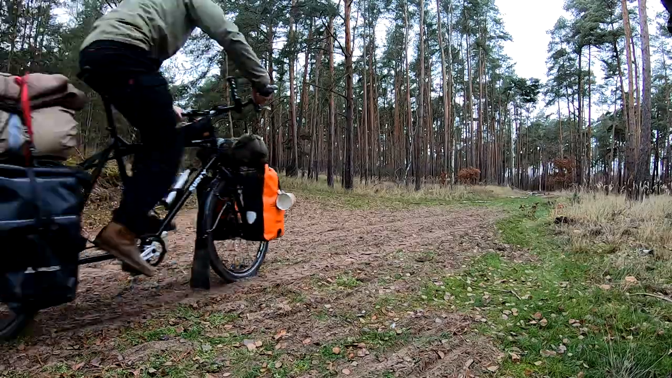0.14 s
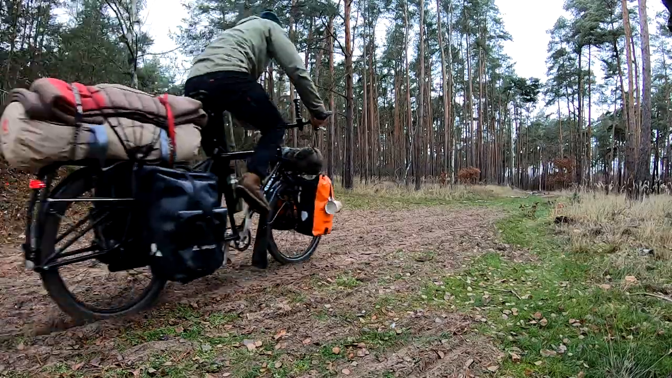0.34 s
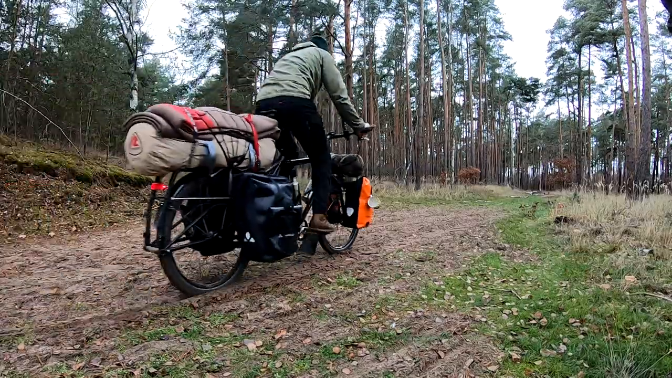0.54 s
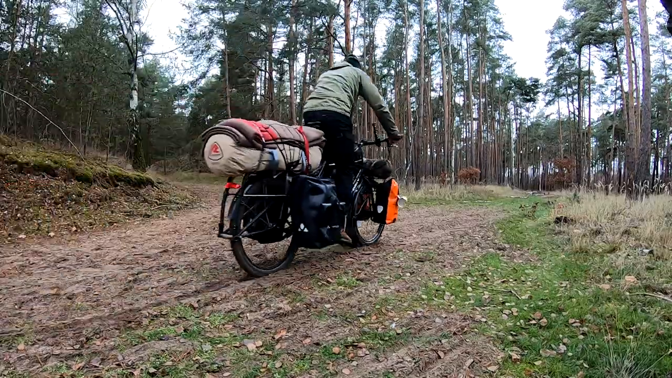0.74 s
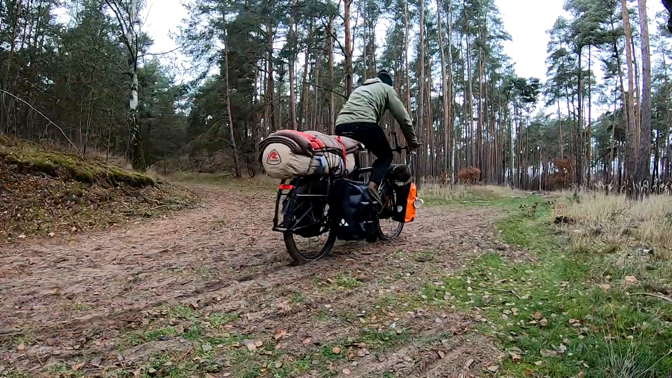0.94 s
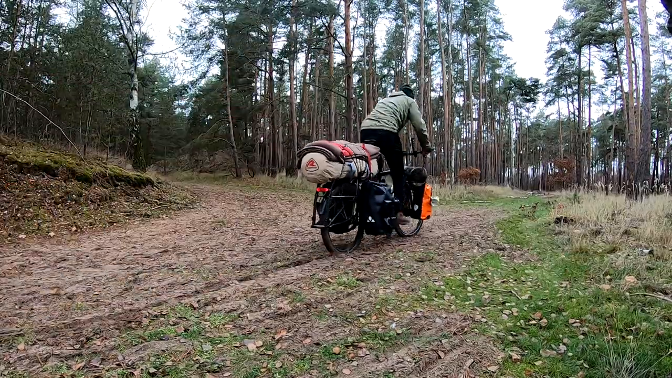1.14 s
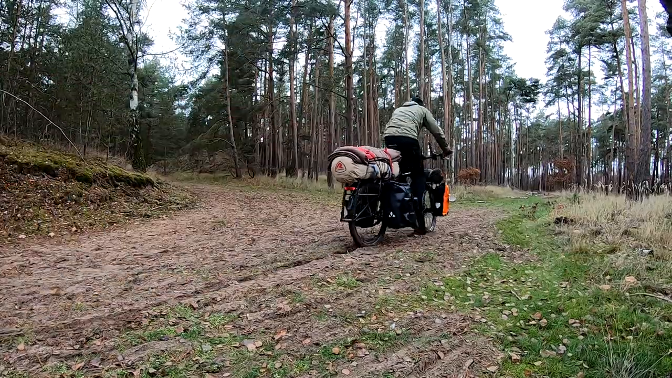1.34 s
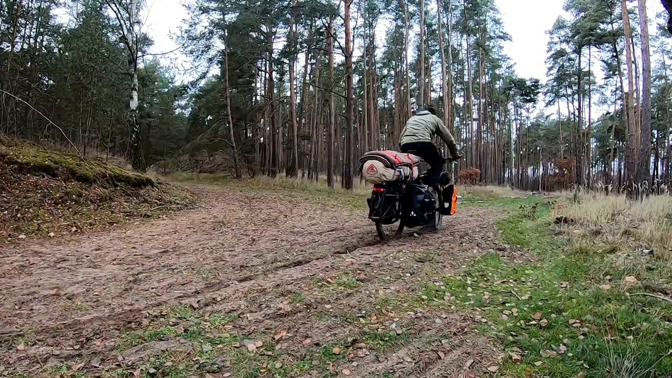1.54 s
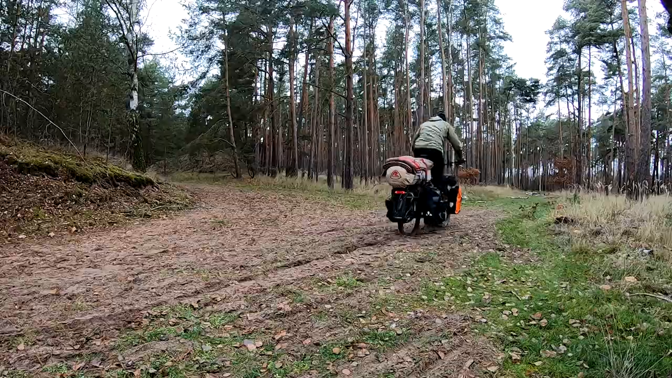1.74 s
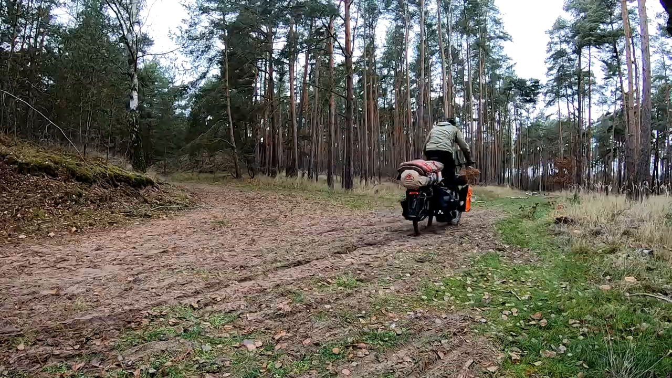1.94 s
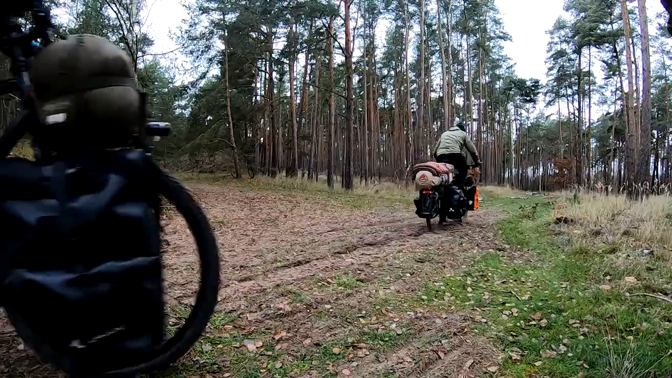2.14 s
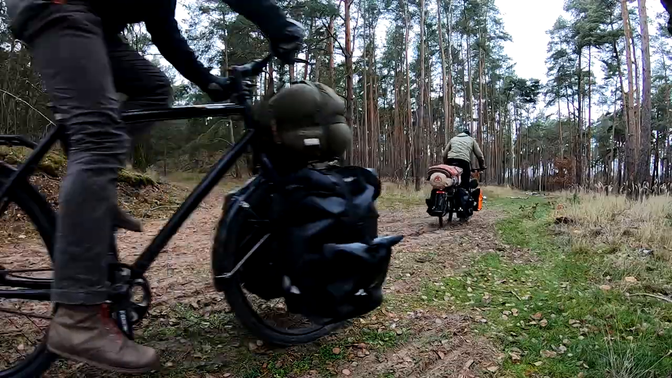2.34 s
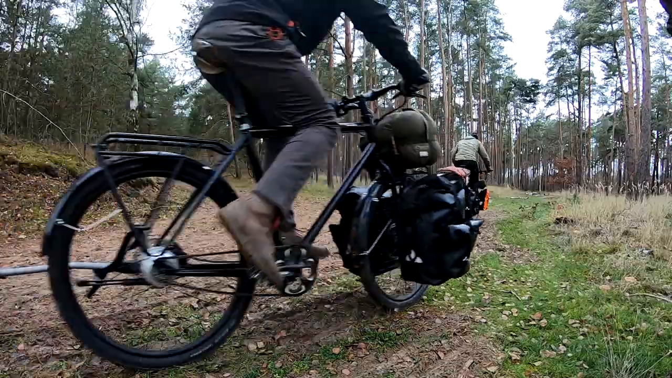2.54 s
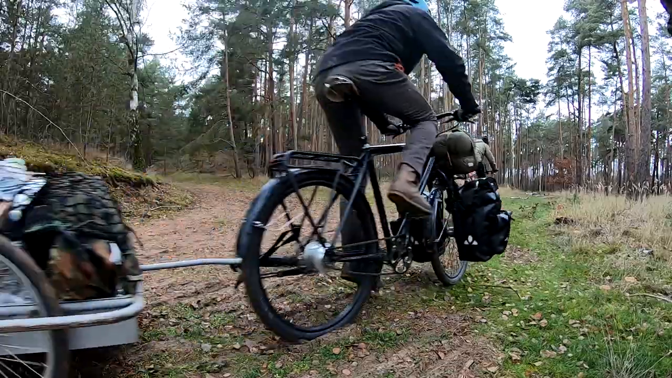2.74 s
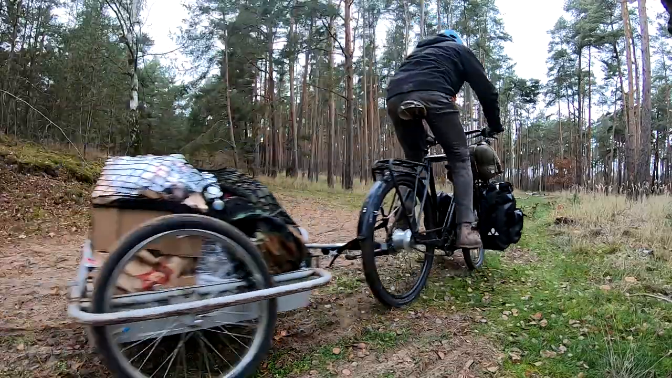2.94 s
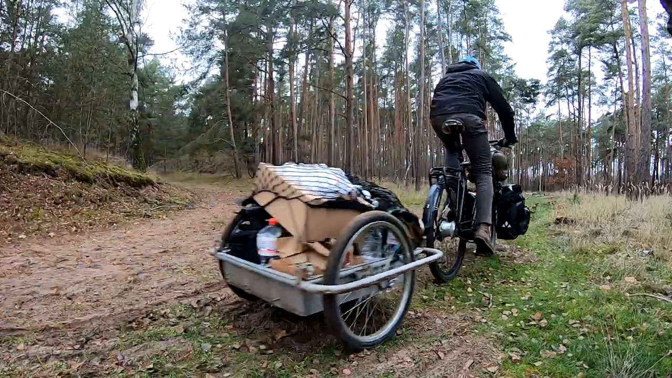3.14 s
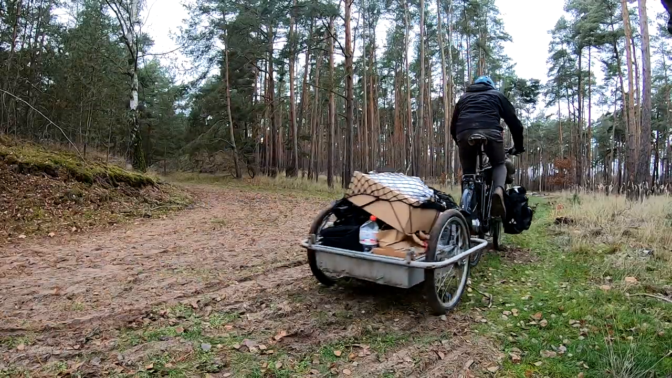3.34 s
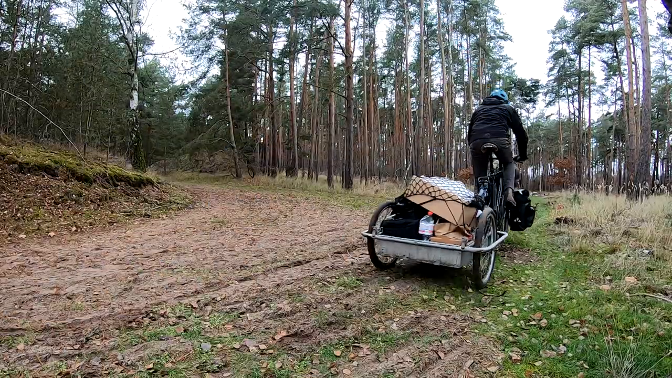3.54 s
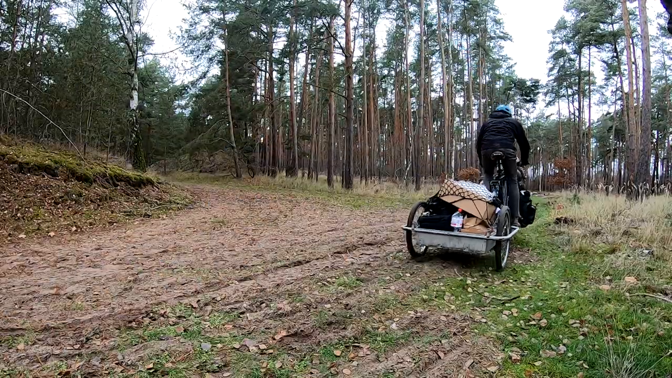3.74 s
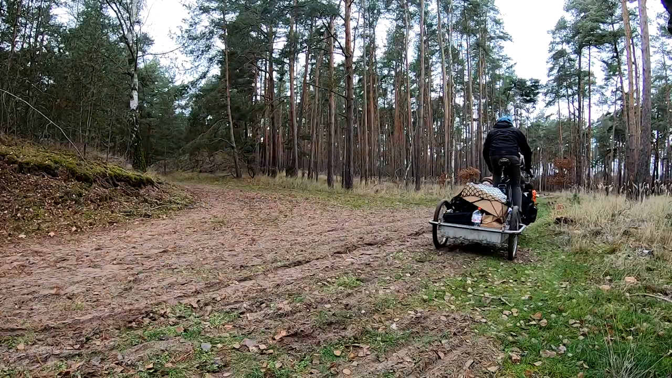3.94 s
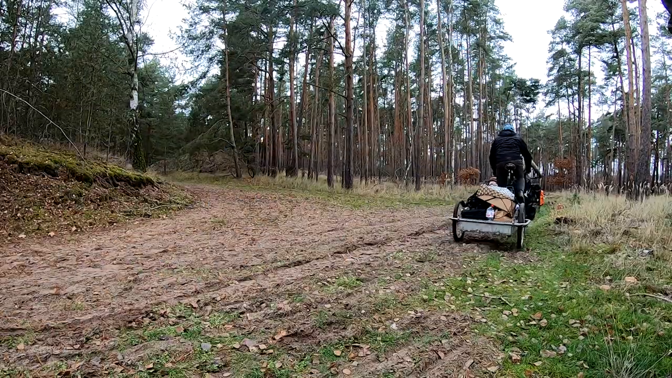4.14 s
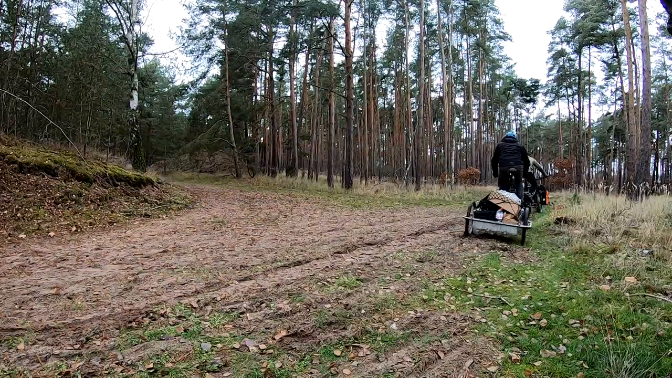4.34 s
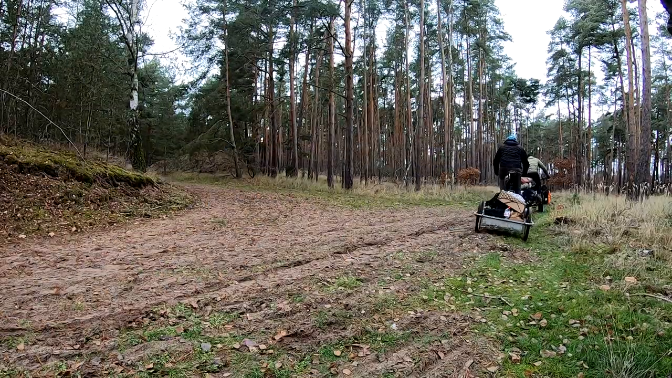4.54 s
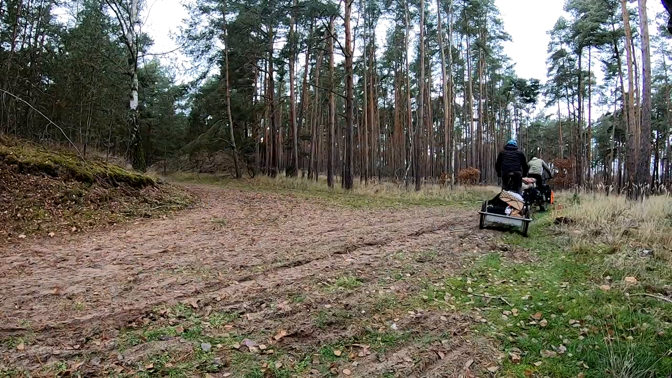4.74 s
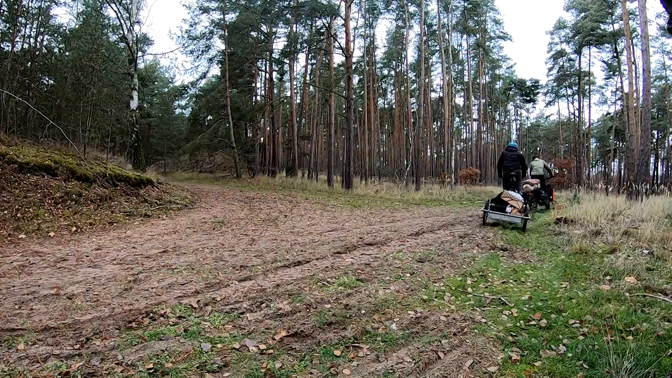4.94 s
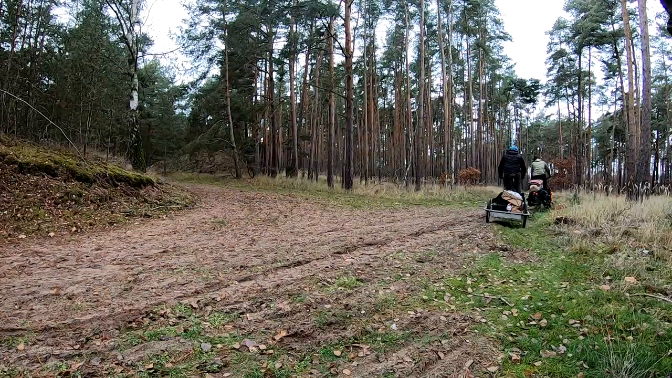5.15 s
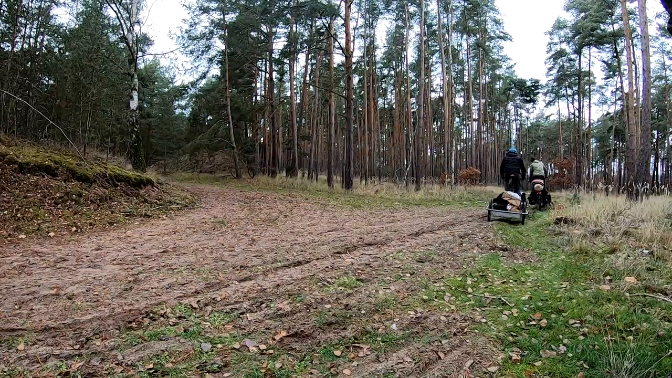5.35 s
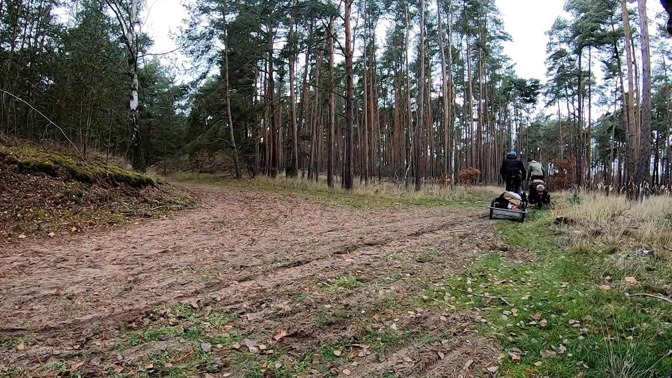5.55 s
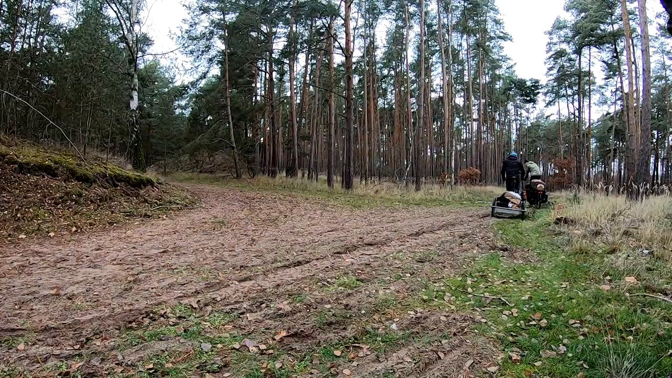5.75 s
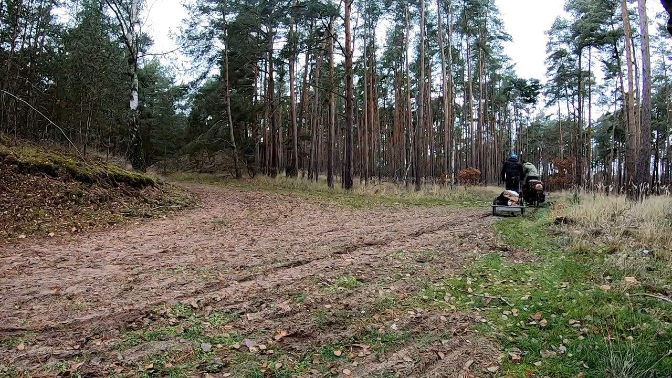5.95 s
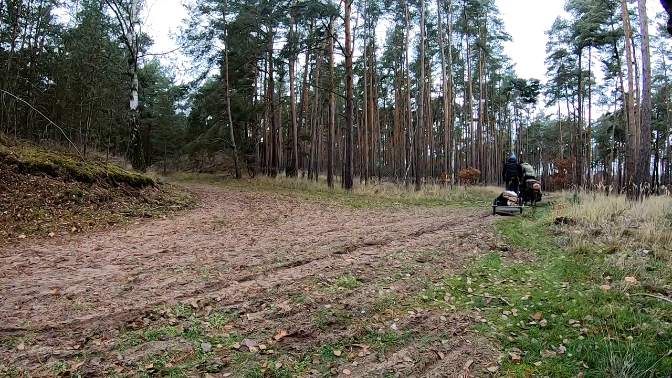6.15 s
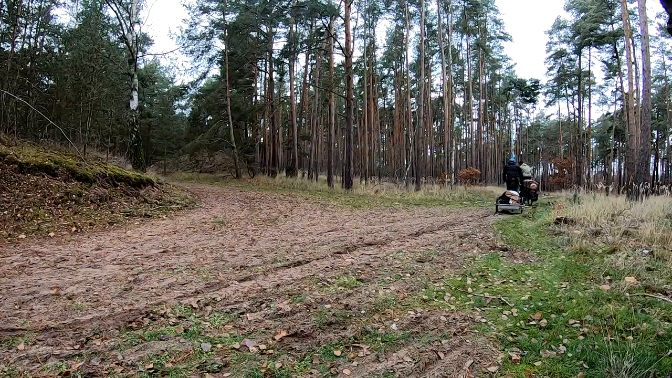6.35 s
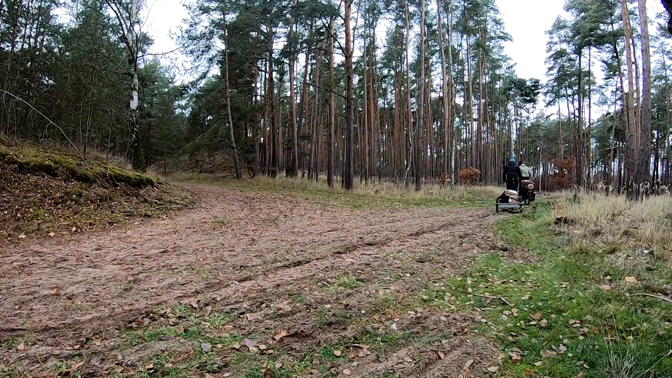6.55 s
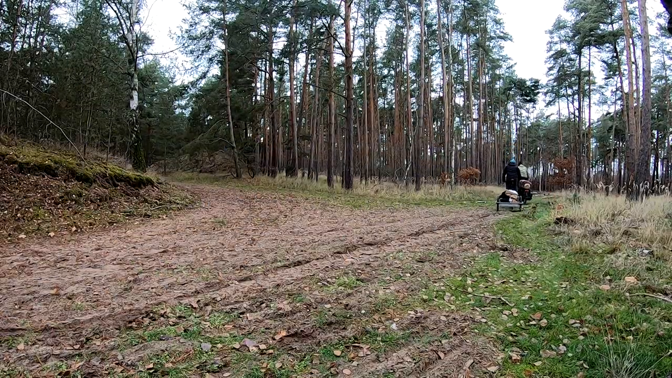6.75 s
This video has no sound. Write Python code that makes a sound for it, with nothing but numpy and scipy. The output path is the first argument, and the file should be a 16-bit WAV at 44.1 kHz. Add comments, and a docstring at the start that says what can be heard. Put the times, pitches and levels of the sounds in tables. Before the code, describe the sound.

Loaded bicycles and a rattling trailer pass close on a sandy forest track, tyres crackling over leaves, with wind thumps and nearby rustling.

```python
"""Loaded bikes on a forest track

Two loaded touring bikes, the second with a trailer, roll past on a sandy forest track and ride away.
Random clicks, filtered and rung, make the tyres, grit, leaves and twigs; bumps and knocks shake the load.
Lumpy filtered noise and single low waves are wind buffeting the microphone; steady faint hiss is the forest.
Dense crackle rustles close beside the microphone at the start and near the end."""
import sys
import numpy as np
from scipy import signal
from scipy.fft import rfft, irfft
from scipy.io import wavfile
from scipy.ndimage import uniform_filter1d

SR = 44100
rng = np.random.default_rng(int(sys.argv[2]) if len(sys.argv) > 2 else 0)


def output_pcm(signal):
    """Save a mono or channel-first signal as 16-bit PCM at the path in sys.argv[1].

    Samples are clipped to [-1, 1] before scaling.
    """
    pcm = np.clip(np.atleast_2d(signal).T, -1, 1) * 32767
    wavfile.write(sys.argv[1], SR, np.round(pcm).astype(np.int16))


N = 299880
TIME = np.arange(N) / SR
SIDES = np.array([[1], [-1]])  # left, right
TOP_HZ = 15400

# Table levels are relative: each source may trim them further.
# Forest air spectrum: [f/Hz, level/dB]
FOREST_COLOUR = [(120, 3.5), (200, -5.5), (780, -6), (1090, -14.5), (4240, -25), (10500, -35), (15000, -48)]
FOREST_DB = -59.5
# How unlike the two channels are: [t/s, side against mid level/dB]
WIDTH = [(0.65, -8.5), (1.1, -21.5), (1.6, -88), (4.5, -41), (4.9, -13.5), (5.3, -15), (5.8, -6.5)]
# The breeze on the microphone dies down: [t/s, level/dB]
BREEZE = [(0, -25), (0.9, -26.5), (1.5, -35.5), (3.0, -38), (4.5, -38.5), (5.1, -42), (6.8, -43)]
# Gusts on top of it: [start t/s, hold t/s, level/dB]
GUSTS = [(0.349, 0.17, -18), (3.662, 0.36, -37), (4.68, 0.28, -37), (5.263, 0.28, -39.5),
         (5.708, 0.36, -39), (6.26, 0.23, -38.5), (6.648, 0.2, -38)]
GUST_ATTACK_S, GUST_RELEASE_S = 0.031, 0.029  # time constants
# Single eddies thump the microphone: [t/s, level/dB, f/Hz]
BUFFETS = [(0.385, -10.5, 81.5), (0.46, -15, 107), (0.506, -22.5, 81.5), (3.928, -22.5, 57.4),
           (5.714, -32, 47.7), (5.774, -32, 48), (5.85, -33, 58), (6.283, -36, 38), (6.46, -33, 76)]
# Wind rumble spectrum: [f/Hz, level/dB]
WIND_COLOUR = [(15, -16.5), (30, 6.5), (50, 0.5), (85, 0), (130, -6.5), (200, -16), (400, -32),
               (4000, -115)]
# The strongest gust tears at the left port: [t/s, level/dB, half length t/s]
BLASTS = [(0.385, -29, 0.037), (0.463, -20.5, 0.011), (0.504, -24.5, 0.0082)]
# Spectrum of those blasts: [f/Hz, level/dB]
BLAST_COLOUR = [(80, -8), (230, 3), (450, -13.5), (900, -27), (1600, -36), (5000, -74)]

# Strokes of rustling close by: [peak t/s, level/dB, rise time constant t/s, fall time constant t/s]
RUSTLES = [(0.01, -44.5, 0.063, 0.13), (0.201, -46, 0.03, 0.085), (0.365, -41, 0.085, 0.064),
           (0.6, -53, 0.086, 0.049), (5.345, -55.5, 0.12, 0.063), (5.53, -58, 0.079, 0.076),
           (5.9, -52.5, 0.046, 0.07), (6.04, -51, 0.041, 0.24), (6.42, -68, 0.081, 0.21)]
# The rustling is on the left at first, on the right later: [t/s, left minus right level/dB]
RUSTLE_PAN = [(.5, 2.5), (5.1, -4.5)]
# Rustling spectrum: [f/Hz, level/dB]
RUSTLE_COLOUR = [(300, -2), (780, 9.5), (1200, 4), (2300, 4), (3700, 5.5), (5500, 1.5), (7500, -2),
                 (10800, -5.5), (12200, -17), (16000, -28)]
# Short scrunches within the rustling: [t/s, level/dB, swell t/s, f/Hz]
SCRUNCHES = [(0.542, -36.5, 0.0041, 4470), (0.601, -35.5, 0.0017, 4200), (5.865, -40, 0.0055, 4200),
             (5.892, -33.5, 0.003, 4360), (6.0128, -30, 0.0065, 3110), (6.088, -34.5, 0.0051, 3100),
             (6.101, -32.5, 0.0039, 4050), (6.4, -45, 0.0041, 4000)]

# Thin shimmer as the bikes ride off, spectrum: [f/Hz, level/dB]
HISS_COLOUR = [(4500, -20), (5600, -1), (6200, -12), (8200, -9), (8900, -2), (9600, -10), (12000, -24)]
# Loose metal gear tinks: [t/s, f/Hz, level/dB, time to fall 60 dB t/s]
TINKS = [(.035, 3630, -47.5, 0.55), (4.223, 5600, -51, 0.073)]
# Twigs and leaves snap: [t/s, level/dB, centre f/Hz, top end level/dB]
SNAPS = [(1.231, -31, 2950, -54), (1.416, -27.5, 2770, -49), (1.5705, -32, 3200, -45.5),
         (1.656, -26.5, 3220, -44), (1.738, -29.5, 2570, -45), (2.1177, -21.5, 2160, -48),
         (2.439, -32, 2460, -56), (2.8485, -35.5, 2900, -47.5), (3.352, -23, 4200, -56),
         (3.4276, -30, 3640, -55), (3.906, -33.5, 2800, -59), (4.1345, -38, 3070, -54),
         (4.222, -39, 3160, -60), (4.4162, -30, 3340, -51), (4.554, -34, 4140, -50),
         (4.446, -39.5, 3330, -62), (4.6267, -37.5, 3680, -58), (4.648, -39, 3660, -61),
         (4.6962, -37.5, 3530, -71), (4.7308, -41.5, 3860, -70), (4.798, -37.5, 3880, -58),
         (4.824, -38, 3750, -72), (5.3334, -42, 5060, -59), (5.447, -38, 3850, -56),
         (5.5253, -40, 3650, -75), (5.5544, -42, 3600, -52), (6.5148, -38.5, 3680, -49),
         (6.752, -37, 3340, -54), (6.786, -39.5, 2470, -69)]
# The load slams on its carrier: [t/s, thump level/dB, thump f/Hz, pannier clack level/dB, frame level/dB]
KNOCKS = [(0.029, -14, 220, -27, -23.5), (1.657, -16, 185, -24, -45), (2.4922, -13, 435, -25, -36),
          (2.502, -12, 263, -18, -45), (2.551, -19, 420, -15.5, -46), (2.611, -16, 335, -21, -48),
          (2.832, -46, 380, -24.5, -31), (2.92, -25, 222, -22, -15), (2.927, -13, 240, -35, -43),
          (2.932, -22, 397, -34, -18.5), (2.9501, -13, 210, -21, -28), (2.957, -19, 316, -30, -24),
          (3.07, -35, 350, -30, -25), (3.133, -41, 330, -19, -31), (4.286, -27.5, 330, -41, -43)]
# Stiff pannier shell and its hooks, ringing tones: [typical f/Hz, level/dB, time to fall 60 dB t/s]
PANNIER = [(447, 1, 0.068), (1120, -4, 0.032), (1380, 6, 0.032), (1770, -1, 0.033), (1920, -1, 0.044),
           (2780, 0, 0.022), (3460, -1, 0.036)]
# Racks and trailer frame, ringing tones: [f/Hz, level/dB, time to fall 60 dB t/s]
FRAME = [(210, -5, 0.2), (900, -8.5, 0.029), (1030, -20.5, 0.05), (1248, -14, 0.077), (1760, -12, 0.046),
         (2026, -19.5, 0.084), (2510, -21, 0.076)]
# A wheel hits a bump: [t/s, thud level/dB, crunch level/dB, ring t/s before limits]
BUMPS = [(0.776, -27, -49, 0.16), (1.038, -22, -39, 0.16), (1.283, -29.5, -39.5, 0.061),
         (1.413, -24, -39.5, 0.035), (1.655, -14.5, -45, 0.1), (1.738, -31, -43, 0.05),
         (1.873, -24, -42.5, 0.048), (2.009, -24, -36, 0.35), (2.119, -39, -29, 0.032),
         (2.327, -21.5, -52, 0.36), (2.355, -18, -34, 0.31), (2.736, -23, -38, 0.052),
         (2.922, -21, -20.5, 0.24), (2.955, -19, -22.5, 0.06), (2.982, -47, -29, 0.099),
         (3.073, -36, -27.5, 0.22), (3.22, -23, -45, 0.1), (3.306, -35, -33, 0.12),
         (3.544, -32, -37, 0.096), (4.04, -33, -42.5, 0.099), (4.417, -50, -35.5, 0.075),
         (6.093, -36, -73, 0.035)]
# Crushed grit spectrum: [f/Hz, level/dB]
CRUNCH_COLOUR = [(200, 7.5), (850, 7), (1900, 0), (2800, -3), (4000, -9), (7000, -20), (11000, -26),
                 (16000, -57)]

# The lone bike, then the one with the trailer: [nearest t/s, mean wheel distance then/m, level/dB]
PASSES = [(0.15, 1.25, -1), (2.507, 2.594, 0)]
SPEED_M_S, FALL_DB_PER_DECADE = 2.93, 30.5  # sound that skims soft ground fades fast with distance
DRUM_DB, GRIT_DB, LEAF_DB = -35, -46.5, -49  # base levels before distance, ground and layer trims
# The wheels move on to the grass verge, which muffles the grit: [from t/s, to t/s]
GRASS_S = (3.2, 3.6)
GRASS_GRIT_DB = -5
# Roughness of the ground: [t/s, level over even ground/dB]
GROUND = [(0.62, -8.5), (1.0, 4.5), (1.13, 1.5), (1.25, 5), (2.38, 1), (2.53, 0.5), (2.72, 2), (2.8, 0),
          (3.03, 3), (3.12, 4.5), (3.27, 1.5), (4.24, 2), (4.38, 6.5), (4.5, 3.5), (4.78, 7), (5.06, -3.5),
          (5.52, 7.5), (5.66, -8), (6.1, 7), (6.3, -5), (6.55, 0.5)]
# Dead leaves on that ground: [t/s, level/dB]
LEAF_COVER = [(0.3, -17), (0.7, 8), (1.1, 1), (2.4, 1), (4.22, -2.5), (4.39, 3), (4.5, -2), (5.1, -3),
              (6.8, 0)]
# Tyre drumming spectrum: [f/Hz, level/dB]
DRUM_COLOUR = [(40, -24), (110, -9), (165, -1), (220, 1.5), (300, -3.5), (420, -8.5), (600, -11.5),
               (850, -19), (1500, -57.5), (5000, -59)]
# Rolling grit spectrum: [f/Hz, level/dB]
GRIT_COLOUR = [(250, -5.5), (550, 8), (850, 5.5), (1250, 2.5), (1800, 4), (2400, -13), (3500, -12.5),
               (15000, -32)]
# Rolling leaf spectrum: [f/Hz, level/dB]
LEAF_COLOUR = [(900, -30), (2000, 0.5), (3000, 2.5), (3900, 1.5), (5100, -4.5), (6100, -14), (9000, -50),
               (16000, -29)]
# Finest sand crackle spectrum: [f/Hz, level/dB]
SAND_COLOUR = [(3000, -22), (6000, 14), (8000, 12.5), (10300, 7), (12500, -5.5), (16000, -18)]


def undb(db):
    """Turn decibels into gain."""
    return 10 ** (np.asarray(db) / 20)


def curves(table):
    """Join timed rows with straight lines: one value a sample for each column."""
    s, *columns = np.transpose(table)
    return [np.interp(TIME, s, column) for column in columns]


def colour(x, points, size=4096):
    """Filter with the given spectrum, never ahead of time, so that clicks keep their sharp front."""
    hz, db = np.transpose(points)
    freqs = np.maximum(np.fft.rfftfreq(size, 1 / SR), 1)
    gain = undb(np.interp(np.log(freqs), np.log(hz), db))
    # folding the cepstrum puts the filter's energy as early as possible
    cepstrum = irfft(np.log(gain))
    cepstrum[1:size // 2] *= 2
    cepstrum[size // 2 + 1:] = 0
    response = irfft(np.exp(rfft(cepstrum)))
    return signal.fftconvolve(x, response)[:len(x)]


def unit(x):
    """Scale to an rms (average strength) of 1."""
    return x / np.sqrt(np.mean(x ** 2))


def steady(x, span_s):
    """Even out the rms over a sliding span: fast grain stays, slow swells go."""
    power = uniform_filter1d(x ** 2, int(span_s * SR))
    return x / np.sqrt(power + 1e-12)


def walk(rate):
    """Random values, rate of them a second, with smooth slides between them."""
    step = (TIME * rate).astype(int)
    held = rng.standard_normal(N)[step]
    return 1.07 * uniform_filter1d(held, int(SR / rate))


def grains(rate, spread_db, count=N):
    """Random clicks, rate of them a second on average, most of them small and a few large."""
    size = undb(spread_db * np.minimum(rng.exponential(size=count), 2 * np.pi))
    happens = rng.random(count) < rate / SR
    return happens * size * rng.choice([-1, 1], count)


def fade(t, t60):
    """Exponential decay, 60 dB down after t60 seconds."""
    return np.exp(-np.log(1000) * t / t60)


def swell(start_s, hold_s, attack_s, release_s):
    """Grow exponentially until start_s, hold at 1, then die away."""
    before = np.maximum(start_s - TIME, 0)
    after = np.maximum(TIME - start_s - hold_s, 0)
    return np.exp(-before / attack_s - after / release_s)


def strike(t, lead_s, t60):
    """Swell quickly for lead_s, then die away."""
    return np.where(t < lead_s, (t / lead_s) ** 4, fade(t - lead_s, t60))


def add(track, s, sound):
    """Mix a sound into a track at time s."""
    start = max(int(s * SR), 0)
    track[start:start + len(sound)] += sound[:N - start]


def ring(x, modes, count=8192):
    """An object rings at its own tones with whatever shakes it."""
    t = TIME[:count]
    response = sum(undb(db) * fade(t, t60) * np.sin(2 * np.pi * hz * t) for hz, db, t60 in modes)
    return signal.fftconvolve(x, response)[:len(x)]


def flakes(rate, low_hz, high_hz, t60, count=13, size=1024):
    """Small brittle bits tick one by one, each at one of several pitches."""
    t = TIME[:size]
    total = 0
    for hz in np.geomspace(low_hz, high_hz, count):
        tick = fade(t, t60) * np.sin(2 * np.pi * hz * t)
        total = total + signal.oaconvolve(grains(rate / count, 1.9), tick)[:N]
    return unit(total)


def uneven(x, spread_db, rate, count=18):
    """Every cluster has its own colour: half-octave bands rise and fall independently."""
    freqs = np.maximum(np.fft.rfftfreq(N, 1 / SR), 1)
    place = np.clip(np.log2(freqs / TOP_HZ) * 2 + count - 1, 0, count - 1)
    spectrum = rfft(x)
    out = 0
    for k in range(count):
        band = irfft(spectrum * np.maximum(1 - abs(place - k), 0), N)
        out = out + band * undb(spread_db * np.clip(walk(rate), -2, 2))
    return out


def forest(width):
    """Faint steady hiss of air in the pines, made of filtered noise."""
    mid, side = (unit(colour(rng.standard_normal(N), FOREST_COLOUR)) for _ in range(2))
    return (mid + 1.6 * width * side * SIDES) * undb(FOREST_DB)


def wind(width, wind_db=-5, gust_db=3.0, left_db=5.0, strong_db=-22, side_db=5, deep_hz=80, dulling=0.29):
    """Eddies tumble over the ports: weak air rumbles deeper, strong gusts flutter higher, large eddies thump."""
    blows = [undb(db) * swell(s, hold_s, GUST_ATTACK_S, GUST_RELEASE_S) for s, hold_s, db in GUSTS]
    breeze = undb(curves(BREEZE)[0])
    level = 20 * np.log10(np.linalg.norm(blows + [breeze], axis=0))
    tilt_db = width * left_db * SIDES / 2  # stronger on the left when wide
    gusts = undb(gust_db * walk(25))
    mid, side = (steady(colour(rng.standard_normal(N) * gusts, WIND_COLOUR), 0.117) for _ in range(2))
    out = (mid + width * undb(side_db) * side * SIDES) * undb(level + wind_db + tilt_db)
    # the weaker the air, the less is left above the deep rumble
    deep = signal.sosfiltfilt(signal.butter(2, deep_hz, fs=SR, output="sos"), out)
    out = deep + (out - deep) * undb(dulling * np.minimum(level - strong_db, 0))
    for s, db, hz in BUFFETS:
        cycles = (TIME - s) * hz
        thump = np.sin(2 * np.pi * cycles) * np.exp(-2 * cycles ** 2)
        out = out + undb(db + tilt_db) * thump
    return out


def blasts(right_db=-12):
    """Turbulence right on the left port gives short, rough blasts, weaker on the right."""
    force = sum(undb(db) * np.exp(-((TIME - s) / half_s) ** 2 / 2) for s, db, half_s in BLASTS)
    left, right = (steady(colour(grains(2500, 1.5), BLAST_COLOUR), 0.027) * force for _ in range(2))
    return np.array([left, undb(right_db) * right])


def scrunches(level_db=-6, top_db=-9, side_db=-9, count=4096):
    """A crisp fold gives way in a dense burst of crackle around its own pitch."""
    out, t = np.zeros((2, N)), TIME[:count]
    for s, peak_db, swell_s, hz in SCRUNCHES:
        push = t / swell_s * np.exp(1 - t / swell_s)
        crisp = [(hz / 8, -16), (hz / 1.7, -16), (hz / 1.5, -5), (hz, 0), (hz * 1.0, -4),
                 (hz * 2.17, -12), (hz * 4, -32)]
        spectra = (crisp, RUSTLE_COLOUR, RUSTLE_COLOUR)
        body, side, top = (unit(colour(grains(7000, 2.8, count) * push, c)) for c in spectra)
        burst = body + undb(top_db) * top + undb(side_db) * side * SIDES
        gain = undb(peak_db + level_db) * np.sqrt(np.mean(push ** 2))
        for channel, sound in zip(out, burst):
            add(channel, s, gain * sound)
    return out


def rustle(level_db=1.5, side_db=-7, sizzle_db=-2, brittle_db=-5):
    """Dry rubbing close by: dense crackle and brittle ticks whose top reaches each port differently."""
    strokes = [undb(db + level_db) * swell(s, 0, rise_s, fall_s) for s, db, rise_s, fall_s in RUSTLES]
    gain = np.linalg.norm(strokes, axis=0)
    rub = undb(3.8 * walk(90))
    mid, side = (steady(colour(grains(6000, 2.15) * rub, RUSTLE_COLOUR), 0.099) for _ in range(2))
    mid = uneven(mid, spread_db=2.5, rate=110) + undb(brittle_db) * flakes(250, 2400, 5200, .012)
    sizzle_colour = [(4000, -14), (7500, 2), (10800, 0), (12200, -7), (16000, -19)]
    sizzle = steady(colour(grains(9000, 2.8) * rub, sizzle_colour), 0.076)
    ports = gain * (mid + undb(side_db) * side * SIDES) + scrunches()
    panned = ports * undb(curves(RUSTLE_PAN)[0] * SIDES / 2)
    return panned + gain * undb(sizzle_db) * sizzle * SIDES / 2


def swish(level_db=-41, start_db=-6, dip_db=-11, pan_db=5, side_db=-4, lag_s=0.00159, nearest_s=0.31, glide_s=0.4):
    """The first bike brushes by; its ground reflection makes hollow tones that glide down, then turn upward."""
    hollow = [(560, -26.5), (720, -1), (900, -1), (1850, -3), (2150, -14), (8000, -50)]
    mirror = .6  # share of the sound that the ground reflects
    lag = lag_s / np.hypot(1, (TIME - nearest_s) / glide_s)
    rush = (colour(rng.standard_normal(N), hollow) for _ in range(2))
    mid, side = (unit(x + mirror * np.interp(TIME - lag, TIME, x)) for x in rush)
    brush = np.interp(TIME, [0, .16, .33, .39], [undb(start_db), undb(dip_db), 1, 0])
    return (mid + undb(side_db) * side * SIDES) * brush * undb(level_db + pan_db * SIDES / 2)


def thin_hiss(level_db=-74, flicker_db=2.5):
    """A faint, high shimmer of noise flickers with the roughness of the ground as the bikes ride off."""
    presence = swell(3.7, 1.6, .2, .25)
    jolts = undb(flicker_db * walk(33) + curves(GROUND)[0] / 2)
    shimmer = unit(colour(rng.standard_normal(N), HISS_COLOUR) * jolts)
    return shimmer * undb(level_db) * presence


def tinks():
    """Small metal parts ring briefly when jolted, each as a fading pure tone."""
    out = np.zeros(N)
    for s, hz, db, t60 in TINKS:
        add(out, s, undb(db) * fade(TIME, t60) * np.sin(2 * np.pi * hz * TIME))
    return out


def snaps(top_db=-3, splinter_db=-20, crack_s=0.017, splinter_s=0.09, count=4096):
    """A twig cracks with a slightly soft front around its own pitch; weaker splintering dies away more slowly."""
    out, t = np.zeros(N), TIME[:count]
    lead_s, body_s, snap_db = .004, .012, -9.5
    body_share = np.sqrt(body_s * SR / count)  # scales the rms as if the energy lay within body_s
    breaking = strike(t, lead_s, crack_s) + undb(splinter_db) * strike(t, lead_s, splinter_s)
    for s, peak_db, hz, edge_db in SNAPS:
        fracture = grains(14000, 2.2, count) * breaking
        wood_colour = [(hz / 8, -26), (hz / 2, -11), (hz, 0), (hz * 1.25, -4), (hz * 2, -25), (hz * 4, -44)]
        wood = unit(colour(fracture, wood_colour))
        edge = unit(colour(fracture, SAND_COLOUR))
        snap = undb(peak_db + snap_db) * wood + undb(edge_db + top_db) * edge
        add(out, s - lead_s / 2, body_share * snap)
    return out


def knocks(thump_db=-1, clack_db=-2, frame_db=0, crack_db=0, cycles=0.47, chatter_s=0.032, detune=0.065, count=8192):
    """The load lands with a thump and a dry crack; the contact chatters and rings pannier and frame."""
    out, t = np.zeros(N), TIME[:count]
    for s, db, hz, shell_db, rack_db in KNOCKS:
        # the shell rings a little differently wherever it is struck
        bag = [(mode_hz * np.exp(detune * rng.standard_normal()), mode_db, t60)
               for mode_hz, mode_db, t60 in PANNIER]
        age = t * hz / cycles
        thump = age * np.exp(1 - age) * np.sin(2 * np.pi * hz * t)
        contact = (t == 0) + grains(2000, 1.5, count) * fade(t, chatter_s) / 4
        parts = (ring(contact, bag), ring(contact, FRAME), colour(contact, CRUNCH_COLOUR))
        shell, rack, crack = (x / abs(x).max() for x in parts)
        clack = undb(clack_db) * shell + undb(crack_db) * crack
        knock = undb(db + thump_db) * thump + undb(shell_db) * clack + undb(rack_db + frame_db) * rack
        add(out, s, knock)
    return out


def bumps(thud_db=-4, crunch_db=0, frame_db=-15, count=8192):
    """Each bump thuds through tyre and luggage, crushes a pocket of grit and rings the frame."""
    out, t = np.zeros(N), TIME[:count]
    lead_s, body_s = .008, .013
    body_share = np.sqrt(body_s * SR / count)  # scales the rms as if the energy lay within body_s
    for s, peak_db, grit_db, ring_s in BUMPS:
        push = strike(t, lead_s, np.clip(ring_s, .015, .25))
        thud = unit(colour(grains(4000, 0.36, count) * push, DRUM_COLOUR))
        crunch = unit(colour(grains(6000, 0.95, count) * push, CRUNCH_COLOUR))
        rack = unit(ring(grains(4000, 0.3, count) * push, FRAME))
        blow = undb(peak_db) * (undb(thud_db) * thud + undb(frame_db) * rack)
        blow = blow + undb(grit_db + crunch_db) * crunch
        add(out, s - .7 * lead_s, body_share * blow)
    return out


def rolling():
    """Levels in dB of drumming, grit and leaves: they follow the bikes' distance and the ground."""
    power = 0
    for s, near_m, db in PASSES:
        distance = np.hypot(near_m, SPEED_M_S * (TIME - s))
        power = power + undb(db - FALL_DB_PER_DECADE * np.log10(distance / near_m)) ** 2
    level = 10 * np.log10(power) + curves(GROUND)[0]
    grass = np.interp(TIME, GRASS_S, [0, GRASS_GRIT_DB])
    return level + DRUM_DB, level + GRIT_DB + grass, level + LEAF_DB + curves(LEAF_COVER)[0]


def litter(leaf_db=-5, stone_db=-4):
    """The tyres break dead leaves and click small stones together, a few at a time."""
    _, grit_level, leaf_level = rolling()
    clusters = undb(3.5 * np.clip(walk(60), -2, 2))
    leaves = unit(flakes(600, 2300, 4700, .006) * clusters)
    stones = unit(flakes(220, 650, 2300, .012) * clusters)
    return leaves * undb(leaf_level + leaf_db) + stones * undb(grit_level + stone_db)


def tyres(drum_db=0, grit_db=0.8, leaf_db=-1.5, frame_db=-6, sand_db=-11, sand_fall=2.64, near_db=-48):
    """Lumps of soil drum under the tread, grit and leaves give way in clusters, and the frame rattles."""
    drum_level, grit_level, leaf_level = rolling()
    # firm and loose patches, shared by all layers
    ground = undb(3 * np.clip(walk(80), -2, 2))
    drum = steady(colour(grains(700, 1.7) * ground, DRUM_COLOUR), 0.222) * undb(drum_level + drum_db)
    grit = steady(colour(grains(1800, 2) * ground, GRIT_COLOUR), .25) * undb(grit_level + grit_db)
    leaves = steady(colour(grains(2500, 1.6) * ground, LEAF_COLOUR), 0.4) * undb(leaf_level + leaf_db)
    rattle = steady(ring(grains(850, 2.0) * ground, FRAME), 0.15) * undb(grit_level + frame_db)
    # the finest crackle fades faster than the leaves whenever they grow quieter
    sand_level = near_db + sand_fall * (leaf_level - near_db) + sand_db
    sand = steady(colour(grains(3600, 1.9) * ground, SAND_COLOUR), 0.41) * undb(sand_level)
    return drum + grit + leaves + rattle + sand


def trunks(x, echo_db=-22, t60=0.037, count=22050):
    """Ground and tree trunks scatter a thin, short echo."""
    tail = rng.standard_normal(count) * fade(TIME[:count], t60)
    return undb(echo_db) * signal.fftconvolve(x, tail / np.linalg.norm(tail))[:N]


def scene():
    """The bikes sit in the middle; their echo and the wind spread wide only at the start and the end."""
    width = undb(curves(WIDTH)[0])
    bikes = uneven(tyres() + bumps(), spread_db=2.2, rate=45)
    bikes = bikes + litter() + knocks() + snaps() + tinks()
    spread = trunks(bikes, echo_db=-6.5, t60=0.02)
    track = bikes + trunks(bikes) + width * spread * SIDES
    close_by = rustle() + swish() + thin_hiss()
    air = wind(width) + blasts() + forest(width)
    return track + close_by + air


def record(dry):
    """The microphone side drops the deepest bass and cuts the top with two filters."""
    dry = signal.sosfilt(signal.butter(2, 18, "high", fs=SR, output="sos"), dry)
    return signal.sosfilt(signal.ellip(10, .2, 80, TOP_HZ, fs=SR, output="sos"), dry)


dry = scene()
out = record(dry)
output_pcm(out)
```